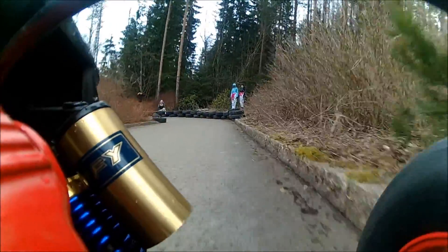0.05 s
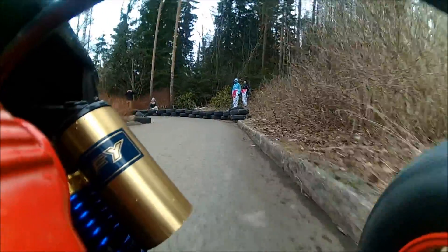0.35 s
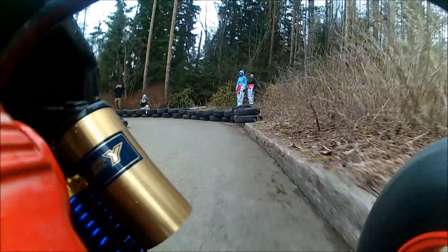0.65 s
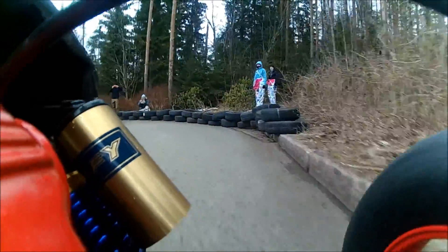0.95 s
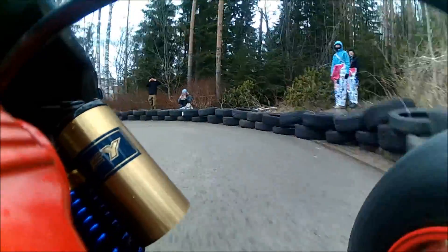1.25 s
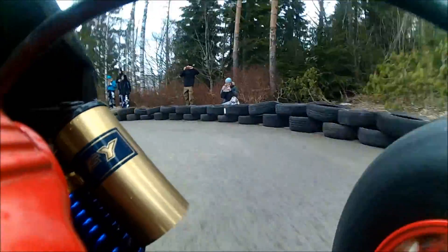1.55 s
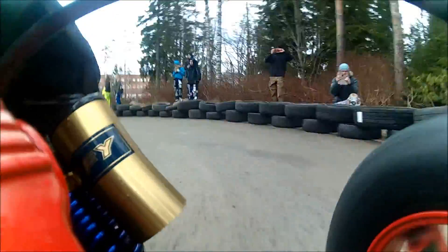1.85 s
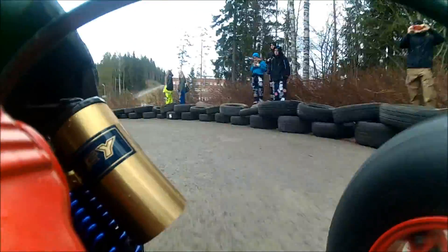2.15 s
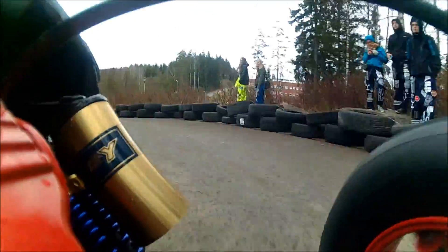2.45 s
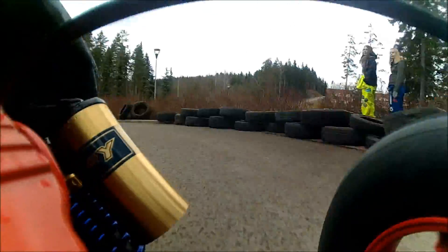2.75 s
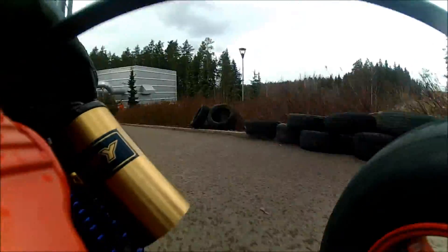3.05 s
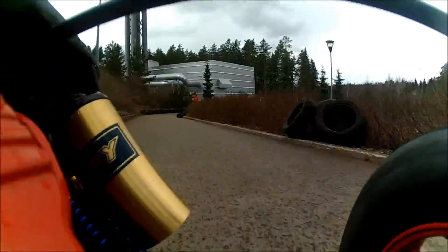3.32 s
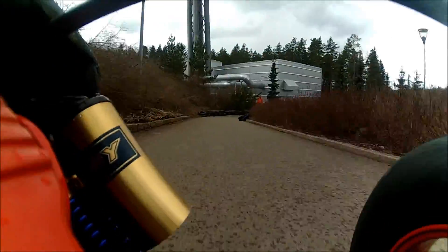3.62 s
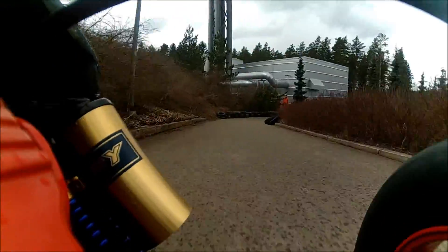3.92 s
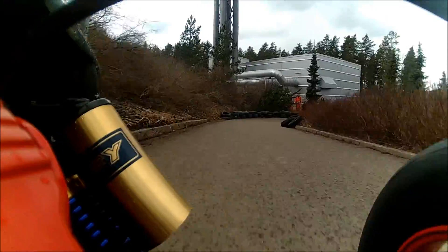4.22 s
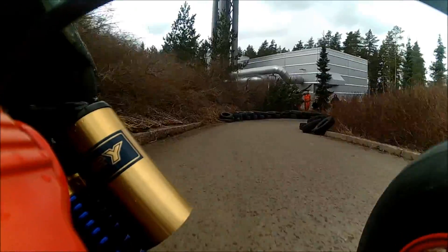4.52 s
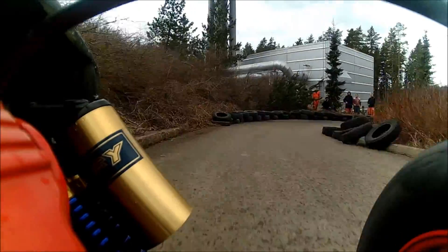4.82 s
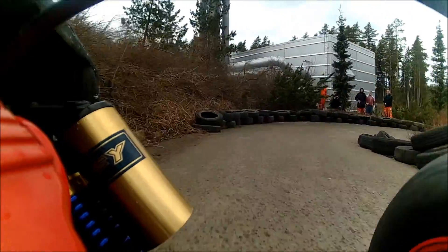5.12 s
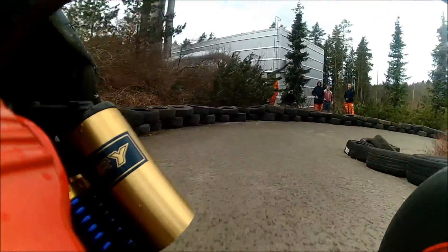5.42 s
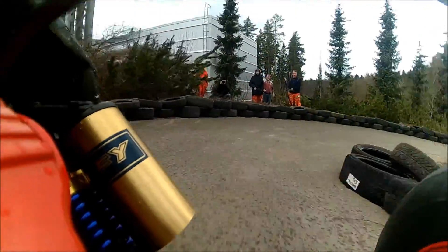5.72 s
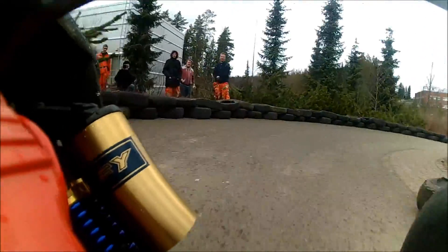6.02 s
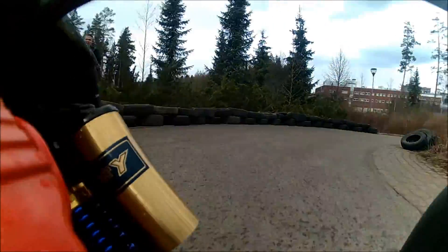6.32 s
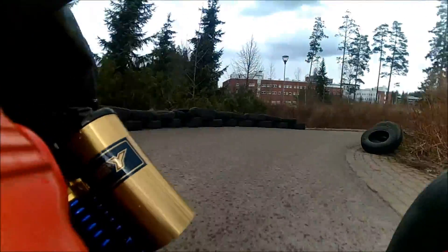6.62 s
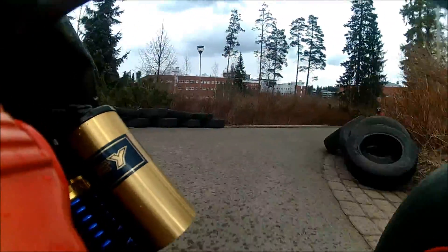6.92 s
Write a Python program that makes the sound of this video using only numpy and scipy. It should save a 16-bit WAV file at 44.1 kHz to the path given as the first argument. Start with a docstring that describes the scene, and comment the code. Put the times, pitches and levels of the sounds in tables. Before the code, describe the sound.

Rapid, hollow chattering and knocking from a cart rolling at speed, with rough tyre noise, short skids and low wind gusts in the bends.

```python
"""An asphalt track with two bends, heard from a camera beside the front wheel of a fast soapbox cart. The
camera mount chatters about 55 times a second, strong and weak in turn; each knock rings the case. In the bends
it shakes faster, loose parts clatter, the tyres skid, the frame drones, wind buffets the microphone and the
rolling noise briefly drops out. A limiter flattens the jolts; the treble falls away steeply above about 4.6
kHz."""
import sys
import numpy as np
from scipy import signal
from scipy.fft import rfft, irfft
from scipy.io import wavfile
from scipy.ndimage import uniform_filter1d, minimum_filter1d

SR = 44100
rng = np.random.default_rng(int(sys.argv[2]) if len(sys.argv) > 2 else 0)


def generate_wav(signal):
    """Clip the signal to [-1, 1] and save it as 16-bit WAV at the path in sys.argv[1]."""
    frames = np.transpose(np.atleast_2d(signal))
    scaled = np.clip(frames, -1, 1) * 32767
    pcm = np.round(scaled).astype(np.int16)
    wavfile.write(sys.argv[1], SR, pcm)


N = 315756
TIME = np.arange(N) / SR
KNOCK_SAMPLES = 1024

# mount shake, faster in the bends (time [s], rate [Hz])
SHAKE = [(0, 59.7), (.55, 58), (1.15, 53), (1.65, 56), (1.85, 88), (2.9, 86), (3.1, 73), (3.4, 72),
         (3.55, 60), (3.85, 56), (4.6, 56), (4.75, 80), (4.9, 54), (5.85, 56), (6.05, 85), (6.5, 70),
         (6.65, 56)]
# hardest knocks of the mount (time [s], level [dB], ring [Hz], thump re ring [dB])
JOLTS = [(0.02, -23, 1050, -12), (0.041, -16, 1010, -20.5), (0.058, -20.5, 845, -13.5),
         (0.077, -21, 1025, -21), (0.113, -19.5, 1010, -22), (0.15, -21.5, 970, -8),
         (0.179, -24, 1020, -11), (0.188, -15.5, 1040, -21), (0.224, -19.5, 1090, -24),
         (0.264, -22.5, 1060, -14), (0.316, -21.5, 810, -15), (0.351, -21.5, 776, -4),
         (0.369, -20.0, 940, -7.5), (0.407, -17, 1070, -25), (0.442, -21.5, 900, -21),
         (0.49, -22, 720, -11), (0.541, -21.5, 970, -7.5), (0.576, -13, 1020, -22),
         (0.612, -19.5, 1070, -22), (0.643, -15.5, 1030, -11), (0.717, -21, 855, -11),
         (0.751, -17, 1070, -30), (0.808, -24, 970, -4), (0.825, -14, 930, -15), (0.859, -19, 1080, -21),
         (0.894, -22.5, 1070, -24), (0.909, -12, 850, -7), (0.97, -19, 1190, -11),
         (1.061, -23.5, 1100, -6.5), (1.08, -21.5, 1124, -21), (1.117, -19.5, 1120, -14),
         (1.137, -22, 940, -15), (1.155, -19.5, 920, -23), (1.173, -21, 1120, -7.5),
         (1.193, -20, 1140, -13), (1.217, -20, 900, -15), (1.236, -18.5, 760, -20),
         (1.27, -16.5, 1054, -12), (1.286, -21, 880, -16), (1.304, -20.5, 1210, -9),
         (1.401, -19, 880, -2.5), (1.456, -19, 870, 2), (1.463, -20.5, 826, -14), (1.487, -19, 920, -23),
         (1.52, -16, 1080, -29), (1.538, -19, 1180, -8), (1.577, -15.5, 880, -18), (1.625, -21.5, 920, -7),
         (1.648, -24.5, 1000, -14), (1.689, -17.5, 840, -23), (1.711, -18, 1080, -22),
         (1.788, -22.5, 1120, -14), (1.799, -16, 1070, -6), (1.849, -18.5, 1130, -22),
         (1.893, -16, 1020, -22), (1.939, -16.5, 995, -29), (1.993, -17.5, 1100, -25),
         (2.031, -15.5, 865, -11.5), (2.113, -18, 930, -18.5), (2.145, -16, 1190, -25),
         (2.162, -20.5, 790, 6), (2.198, -22, 865, -4), (2.232, -23, 815, -4), (2.243, -23.5, 1600, -20),
         (2.254, -23, 1300, -14), (2.274, -16.5, 1220, -7), (2.328, -19.5, 1220, -30),
         (2.384, -18, 1150, -19), (2.406, -17.5, 980, -15), (2.441, -20.5, 1040, -19),
         (2.502, -19.5, 737, -3), (2.541, -15, 974, -32), (2.553, -20.5, 940, -27), (2.63, -20.5, 1120, -9),
         (2.661, -20.5, 1027, -14), (2.67, -17.5, 704, -17), (2.769, -17.5, 880, -15),
         (2.861, -18, 1020, -11), (2.894, -14, 1200, -24), (2.932, -19, 1040, -10), (2.942, -15, 910, -5.5),
         (2.957, -19.5, 1090, -11), (2.968, -23, 1090, -12), (2.991, -20, 1000, -7),
         (3.078, -20, 1086, -9.5), (3.108, -18.5, 920, -23), (3.121, -20, 940, -22),
         (3.174, -20.5, 950, -7), (3.184, -21.5, 1012, -18), (3.216, -18.5, 1080, -21),
         (3.227, -20.5, 955, -2.5), (3.255, -23, 950, -33), (3.286, -21, 770, -6), (3.299, -18, 1060, -21),
         (3.311, -18, 1320, -10), (3.327, -21, 1190, -12), (3.339, -21, 983, -1.5),
         (3.383, -19.5, 890, -26), (3.423, -23, 920, -3), (3.469, -20.5, 1045, -15), (3.5, -20.5, 980, -28),
         (3.613, -23.5, 1010, -10), (3.628, -19, 1090, -9), (3.645, -21, 890, -12), (3.668, -20.5, 750, 0),
         (3.726, -24.5, 770, -9), (3.744, -23, 858.3, -15), (3.819, -20, 988.7, -29),
         (3.89, -17.5, 1060, -6), (3.928, -22.5, 850, -23), (3.944, -21, 797, -13), (4.03, -21, 890, -21),
         (4.119, -21.5, 861, 0.5), (4.152, -20.5, 1130, -25), (4.187, -14, 1087, -27),
         (4.205, -22, 1009, -6), (4.299, -19, 940, -20), (4.315, -20, 958, -3.5), (4.334, -15, 840, -5.5),
         (4.376, -19, 992, -24), (4.41, -15, 1000, -31), (4.449, -21.5, 851, -7), (4.518, -19.5, 1080, -19),
         (4.553, -20.5, 1041, -11), (4.588, -20, 866, -25), (4.826, -21.5, 965, -8),
         (4.873, -22.5, 953.4, -6), (4.93, -19.0, 1030, -11), (4.966, -18, 967.6, -16),
         (5.005, -19, 1100, -15), (5.078, -13.5, 1090, -19), (5.185, -17.5, 1030, -23),
         (5.223, -21, 1090, -26), (5.261, -14.5, 1010, -20), (5.296, -18.5, 1060, -28),
         (5.324, -20, 920, -19), (5.449, -19.5, 1040, -4), (5.464, -20, 950, -12),
         (5.476, -20.5, 1090, -13), (5.507, -16.5, 1030, -30), (5.515, -22, 1010, -18),
         (5.528, -18, 1050, -8.5), (5.565, -22.5, 960, -19), (5.637, -19.5, 940, -15),
         (5.664, -22, 930, -14), (5.691, -15.5, 1080, -21), (5.709, -11, 788, -24), (5.748, -16, 968, -15),
         (5.784, -16.5, 1070, -17), (5.819, -16.5, 1090, -13), (5.855, -20.5, 1090, -16),
         (5.952, -19.5, 1034, -9.5), (5.996, -15, 974, -6), (6.034, -18, 930, -4), (6.086, -14, 970, -26),
         (6.105, -19, 1120, -21), (6.15, -18, 921.6, -7), (6.193, -10, 1030, -26),
         (6.204, -20.5, 1020, 1.5), (6.232, -21.5, 1000, -1), (6.262, -11.5, 1000, -6),
         (6.275, -10, 940, -18), (6.341, -14.5, 934, -24.5), (6.399, -21.5, 988, -3),
         (6.455, -18.5, 1080, -9), (6.563, -23.5, 850, -14), (6.588, -19.5, 1128, -28),
         (6.679, -19.5, 1080, -7), (6.733, -22, 945, -16), (6.748, -20.5, 1020, 2), (6.762, -14, 901, -13),
         (6.768, -17, 790, -9), (6.799, -17, 1080, -16), (6.844, -20.5, 1010, -16), (6.859, -20.5, 940, -4),
         (6.908, -20.5, 875, -15), (6.938, -18, 869, -5), (6.943, -19, 944, -13), (7.037, -13.5, 1070, -21),
         (7.147, -18.5, 1010, -13.5)]
# dry contact spectrum (frequency [Hz], level [dB])
TICK_SPECTRUM = [(300, -9), (1200, -5), (2000, 4), (2600, 3.5), (3300, 1), (4000, -3), (8000, -15.5),
                 (15000, -24.5)]


def mount(tap_s, shake_count, tap_hz=880, alternation_db=0.66, miss_db=9, miss_share=.08):
    """Mount hitting its seat: hard jolts, taps between; faster taps are lighter and more uneven."""
    # tap strength (time [s], level [dB])
    chatter = [(0.0, -24.5), (0.83, -25), (1.03, -27), (2.16, -28), (2.21, -27), (2.4, -24.5),
               (2.48, -32.5), (2.93, -30.5), (3.01, -29), (3.12, -26), (3.58, -26), (3.92, -28.5),
               (4.0, -33.5), (4.16, -25), (4.56, -24.5), (4.69, -35.5), (4.8, -32.5), (4.96, -27),
               (5.31, -23), (5.39, -34), (5.49, -22.5), (5.6, -26.5), (5.71, -24.5), (5.89, -26.5),
               (6.0, -25), (6.51, -26.5), (6.64, -29), (6.72, -25.5), (7.15, -26)]
    # wheel briefly runs smoothly (centre [s], length [s], change [dB])
    lulls = [(.51, 0.032, -7), (.68, 0.043, -8.5), (.935, 0.025, -13), (1.01, 0.027, -4.5),
             (1.425, 0.075, -14.5), (1.67, 0.03, -6), (2.47, 0.051, -6.5), (3.03, .07, -5.5),
             (3.58, 0.078, -12.5), (3.763, 0.04, -16), (3.98, 0.027, -14), (4.484, .025, -13),
             (4.245, 0.057, -6), (4.85, 0.037, -5.5), (5.39, 0.057, -7.5), (5.925, 0.065, -10.5),
             (6.245, 0.026, -6), (6.385, 0.045, -4.5), (6.89, 0.046, -5.5), (6.99, 0.027, -14)]
    jolt_s, strength_db, ring_hz, thump_db = np.transpose(JOLTS)
    jolt_db = strength_db - 0.4
    jolts = knocks(jolt_s, jolt_db, ring_hz, thump_db, width_hz=573, bounce=1.0, bounce_s=.00176)

    level_draw, pitch_draw, thump_draw = rng.standard_normal((3, len(tap_s)))
    faster_oct = np.log2(shake_ratio(tap_s))
    uneven_db = (1.5 + 0.5 * faster_oct) * level_draw - miss_db * (rng.random(len(tap_s)) < miss_share)
    last_before_jolt = np.r_[np.diff(shake_count) < 1, False]
    pattern_db = alternation_db * (-1) ** shake_count - 1.0 * last_before_jolt
    lull_db = swells(lulls)
    tap_db = at(chatter, tap_s) + 2 + np.interp(tap_s, TIME, lull_db)
    tap_db += pattern_db + uneven_db - 3 * faster_oct
    tap_args = tap_s, tap_db, tap_hz * np.exp(.18 * pitch_draw), -15 + 7 * np.minimum(thump_draw, 1)
    taps = knocks(*tap_args, width_hz=780, bounce=0.9, bounce_s=.001968) + double_knocks(*tap_args)
    return jolts + taps + contacts(np.r_[jolt_s, tap_s], np.r_[jolt_db, tap_db], lull_db)


def chatter_times(jolt_s, jitter=.06):
    """One tap per shake between jolts, looser when fast. Returns times and shakes since the jolt."""
    shakes = np.cumsum(at(SHAKE)) / SR
    edges = np.r_[0, np.interp(jolt_s, TIME, shakes), shakes[-1]]
    runs = [np.linspace(a, b, max(round(b - a), 1) + 1)[1:-1] for a, b in zip(edges, edges[1:])]
    tap_s = np.interp(np.concatenate(runs), shakes, TIME)
    shake_count = np.concatenate([1 + np.arange(len(run)) for run in runs])
    rate_hz = at(SHAKE, tap_s)
    jitter_s = jitter * (rate_hz / np.mean(rate_hz)) ** 4 / rate_hz
    return tap_s + jitter_s * rng.standard_normal(len(tap_s)), shake_count


def knocks(times_s, level_db, ring_hz, thump_db, width_hz, bounce, bounce_s):
    """Each knock lands and bounces twice within a few ms, exciting a case ring and a lower thump."""
    # camera case spectrum (frequency [Hz], level [dB])
    case_spectrum = [(40, -22.5), (150, 8), (300, 0), (500, 7), (800, 3), (1300, 2), (1600, -3.5),
                     (2000, -4.5), (2500, -15.5), (3200, -23), (4400, -33.5), (8000, -52)]
    size = KNOCK_SAMPLES
    gap1, gap2, bounce1, bounce2, polarity = rng.random((5, len(times_s), 1))
    bins_hz = np.fft.rfftfreq(size, 1 / SR)
    first_s = bounce_s * (0.46 + gap1)
    second_s = first_s + bounce_s * (0.31 + gap2)
    force = 1 + bounce * (2 * bounce1 - 1) * np.exp(-2j * np.pi * bins_hz * first_s)
    force += bounce * (bounce2 - .5) * np.exp(-2j * np.pi * bins_hz * second_s)
    build_up = 1 - 2 * resonance(ring_hz[:, None], 2200, size)  # all-pass: delays the ring
    ring = resonance(ring_hz[:, None], width_hz, size) ** 2 * build_up
    thump = undb(thump_db)[:, None] * resonance(520, 330, size) ** 2
    sounds = irfft(np.sign(polarity - .5) * force * (ring - thump) * response(case_spectrum, size))
    rms = np.sqrt(np.sum(sounds ** 2, axis=1) / (.006 * SR))  # energy spread over 6 ms
    return place(times_s, sounds * (undb(level_db) / rms)[:, None])


def double_knocks(times_s, level_db, ring_hz, thump_db, share=.13, mean_lag_s=.005):
    """Some taps double: a softer, lower knock follows."""
    twice = rng.random(len(times_s)) < share
    later_s = times_s + mean_lag_s * (.5 + rng.random(len(times_s)))
    return knocks(later_s[twice], level_db[twice] - 3, .9 * ring_hz[twice], thump_db[twice],
                  width_hz=1000, bounce=0.9, bounce_s=.002)


def contacts(knock_s, knock_db, lull_db, lag_s=.0004):
    """Dry tick and sharp snap as the mount meets its seat."""
    # snap spectrum (frequency [Hz], level [dB])
    snap_spectrum = [(1500, -28.5), (3000, -9), (4500, -3.5), (8000, -1), (12000, -2.5), (15000, -4)]
    # treble of the knocks (time [s], level [dB])
    treble = [(0.0, -88.5), (0.16, -71.5), (0.42, -92.5), (1.38, -82), (1.84, -72.5), (2.37, -75.5),
              (3.13, -78), (3.36, -74.5), (3.57, -94), (3.65, -81), (4.0, -85.5), (4.48, -89.5),
              (4.75, -73), (4.88, -94.5), (5.22, -79), (5.89, -83.5), (6.03, -72), (6.46, -80),
              (6.56, -71.5), (6.69, -83), (6.8, -74.5), (6.91, -94), (7.15, -74)]
    # glancing hits, thin and bright (centre [s], length [s], tick rise [dB])
    glances = [(3.69, 0.034, 13), (4.745, 0.15, 10), (6.78, 0.072, 2)]
    times_s = knock_s + lag_s
    tick = ticks(times_s, knock_db, TICK_SPECTRUM, crunch=.25, crunch_s=.002, follow=.76, scatter_db=7)
    snap = ticks(times_s, knock_db, snap_spectrum, crunch=.13, crunch_s=.00054, follow=.1, scatter_db=16)
    treble_db = at(treble)
    tick_db = -53 + lull_db / 2 + swells(glances) + .3 * (treble_db - np.mean(treble_db))
    return undb(tick_db) * tick + undb(treble_db + 14) * snap


def ticks(times_s, knock_db, spectrum, crunch, crunch_s, follow, scatter_db):
    """Impulses with a decaying crunch, partly following knock level; rms 1."""
    noise = 2 * rng.random((len(times_s), KNOCK_SAMPLES)) - 1
    contact = 2 * crunch * noise * np.exp(-np.arange(KNOCK_SAMPLES) / SR / crunch_s)
    contact[:, 0] = 1
    level_db = follow * knock_db + scatter_db * noise[:, 0]
    return colour(place(times_s, contact * undb(level_db)[:, None]), spectrum)


def tyres(roar_db, scrub_onset_db=-39, crunch_s=.001):
    """Rubber on coarse asphalt: fine grit roars; scrubbing adds judder and louder stone clacks."""
    # tyre roar spectrum (frequency [Hz], level [dB])
    roar_spectrum = [(60, -32.5), (200, -11.5), (350, -7.5), (500, 0.5), (750, 2.5), (1050, 4), (1400, -5),
                     (2000, -11.5), (2500, -24.5), (3200, -51), (4400, -55.5), (8000, -61)]
    road = grit(rate_hz=520, spread_db=-1.0) + undb(-3) * rng.standard_normal(N)
    rolling = colour(road, roar_spectrum) + undb(-40) * colour(road, TICK_SPECTRUM)
    stones = grit(rate_hz=120, spread_db=2.2)
    crunch_envelope = signal.lfilter([1], [1, -np.exp(-1 / (crunch_s * SR))], np.abs(stones))
    crunch = crunch_envelope * rng.standard_normal(N)
    clacks = undb(-4) * colour(stones, roar_spectrum) + undb(-31) * colour(crunch, TICK_SPECTRUM)
    scrub = (2.06 + np.tanh((roar_db - scrub_onset_db) / 2)) / 2
    judder_db = (1.3 + 2.4 * scrub) * np.minimum(wander(120), 1.2)
    return (rolling + scrub * clacks) * undb(roar_db + judder_db - 2 * scrub)


def grit(rate_hz, spread_db):
    """Random impacts at rms 1; a few are larger (spread > 0) or smaller (spread < 0)."""
    hit, sign, size = rng.random((3, N))
    size_db = -spread_db * np.log(np.maximum(size, .06))
    return unit((hit < rate_hz / SR) * np.sign(sign - .5) * undb(size_db))


def pre_knock_dips_db(knock_s, dip_db=-7, dip_db_per_oct=-12, lead_s=.006):
    """The rolling noise dips briefly just before each knock, deeper at higher shake rates."""
    dipping = np.zeros(N)
    for s in knock_s:
        dipping[int(max(s - lead_s, 0) * SR):int(max(s, 0) * SR)] = 1
    return (dip_db + dip_db_per_oct * np.log2(shake_ratio())) * uniform_filter1d(dipping, size=96)


def clatter(load_db, loose_db=-37, centre_hz=950, scatter_db=4, count=400):
    """Loose chassis parts knock at random pitches, loud under high load and fast shake."""
    times_s = rng.random(count) * TIME[-1]
    level_draw, pitch_draw = rng.standard_normal((2, count))
    drive_db = np.interp(times_s, TIME, load_db)
    shaken = np.clip(shake_ratio(times_s) - 1, .01, .3) / .3
    level_db = drive_db + 4.5 + np.minimum(drive_db - loose_db, 0)
    level_db += 20 * np.log10(shaken) + scatter_db * level_draw
    return knocks(times_s, level_db, centre_hz * np.exp(.3 * pitch_draw), thump_db=np.full(count, -10),
                  width_hz=500, bounce=0.58, bounce_s=.0014)


def frame(drift=.007):
    """Road-driven frame modes waver as it flexes; the lowest swells most."""
    # frame modes (frequency [Hz], nominal width [Hz], gain [dB])
    modes = [(111.1, 5.3, -12.5), (289.3, 11, 1.5), (478.6, 28, 3)]
    # frame drone (time [s], level [dB])
    drone = [(0.0, -47.5), (0.53, -46.5), (0.8, -44.5), (1.04, -48.5), (1.31, -43.5), (2.48, -44.5),
             (2.77, -38), (3.09, -47.5), (4.03, -47.5), (4.32, -45.5), (4.78, -52.5), (5.47, -42.5),
             (5.57, -49), (6.05, -40.5), (6.22, -43.5), (6.48, -37.5), (6.74, -41.5), (7.15, -44)]
    drone_db = at(drone)
    swell_db = 0.5 * (drone_db - np.mean(drone_db))
    lowest_hz = modes[0][0]
    flexed_samples = np.cumsum(1 + drift * wander(6))
    out = np.zeros(N)
    for hz, width_hz, gain_db in modes:
        hum = np.interp(flexed_samples, np.arange(N), ringing_noise(hz, 2 * width_hz), period=N)
        out += undb(drone_db + gain_db - 1 + swell_db * (lowest_hz / hz) ** 2) * hum
    return out


def scrapes(relative_width=0.17):
    """Chassis parts rub briefly and rasp around one pitch."""
    # rubs (start [s], length [s], level [dB], pitch [Hz])
    rubs = [(1.314, 0.025, -26, 1000), (1.57, 0.014, -44, 2100), (2.76, 0.017, -36.5, 2140),
            (2.82, 0.0083, -38, 2630), (3.072, 0.015, -45, 2430), (5.11, 0.018, -38, 2300),
            (5.113, 0.07, -28, 490), (5.136, 0.017, -23, 1850), (5.85, 0.031, -50.5, 2630),
            (6.136, 0.05, -29.5, 467), (6.264, 0.0081, -22, 520), (6.461, 0.05, -40.5, 1920)]
    out = np.zeros(N)
    for start_s, length_s, level_db, hz in rubs:
        arch = np.sin(np.pi * np.clip((TIME - start_s) / length_s, 0, 1))
        out += undb(level_db) * np.sqrt(np.abs(arch)) * ringing_noise(hz, relative_width * hz)
    return out


def pings(decay_s=.0022):
    """Thin, high ticks of loose metal on metal."""
    # strikes (time [s], level [dB])
    strikes = [(1.025, -50), (1.218, -50), (1.578, -41), (1.647, -45), (1.79, -46), (1.963, -46),
               (2.094, -46), (2.568, -43), (2.767, -46), (2.816, -48), (3.354, -43), (4.725, -49),
               (4.757, -56), (6.533, -54)]
    envelope = sum(undb(db) * (TIME > s) * np.exp(-np.abs(TIME - s) / decay_s) for s, db in strikes)
    return envelope * ringing_noise(hz=8600, width_hz=1700)


def wind(flutter_db=1, boom_db=-59):
    """Low buffeting on the microphone over a steadier deep boom."""
    # buffeting spectrum (frequency [Hz], level [dB])
    spectrum = [(15, -63.5), (26, -45), (34, -19.5), (44, -8.5), (58, -7), (90, -6), (200, -8.5),
                (400, -25), (1000, -33.5), (3000, -57.5)]
    # gusts (time [s], level [dB])
    gusts = [(0.0, -59), (1.09, -66), (1.84, -48), (2.73, -52.5), (3.17, -47.5), (4.24, -75), (4.74, -65),
             (5.05, -64.5), (5.8, -61.5), (6.05, -47.5), (6.6, -57), (7.15, -61.5)]
    gust_db = at(gusts)
    boom = ringing_noise(hz=45, width_hz=18) * undb(boom_db + 0.41 * (gust_db - np.mean(gust_db)))
    buffeting = colour(rng.standard_normal(N), spectrum) * undb(gust_db - 1 + flutter_db * wander(25))
    return buffeting + boom


def undb(db):
    """Decibels to gain."""
    return 10 ** (np.asarray(db) / 20)


def unit(x):
    """Scale to rms 1."""
    return x / np.sqrt(np.mean(x ** 2))


def at(table, times_s=TIME):
    """Interpolate a (time [s], value) curve."""
    return np.interp(times_s, *np.transpose(table))


def shake_ratio(times_s=TIME):
    """Shake rate over its starting value."""
    return at(SHAKE, times_s) / SHAKE[0][1]


def swells(table):
    """Sum of cosine arches in dB from (centre [s], length [s], change [dB]) rows."""
    return sum(db * np.cos(np.pi * np.clip((TIME - s) / length_s, -.5, .5)) for s, length_s, db in table)


def wander(rate_hz):
    """Random steps, smoothed twice; spread near 1."""
    hold = int(SR / rate_hz)
    steps = np.repeat(rng.standard_normal(N // hold + 1), hold)
    return 1.65 * uniform_filter1d(uniform_filter1d(steps, hold), hold)[:N]


def response(points, size):
    """Minimum-phase response through (frequency [Hz], level [dB]) points."""
    hz, db = np.transpose(points)
    bins_hz = np.maximum(np.fft.rfftfreq(size, 1 / SR), 1)
    gain = undb(np.interp(np.log(bins_hz), np.log(hz), db))
    cepstrum = irfft(np.log(gain), size)
    cepstrum[1:size // 2] *= 2
    cepstrum[size // 2 + 1:] = 0
    return np.exp(rfft(cepstrum))


def colour(x, spectrum):
    """Filter by a spectrum; rms 1."""
    return unit(irfft(rfft(x) * response(spectrum, N), N))


def resonance(hz, width_hz, size):
    """Frequency response of one damped mode."""
    s = 1j * np.fft.rfftfreq(size, 1 / SR)
    return s * width_hz / (s ** 2 + s * width_hz + hz ** 2)


def ringing_noise(hz, width_hz):
    """Noise passed twice through a resonance; rms 1."""
    return unit(irfft(rfft(rng.standard_normal(N)) * resonance(hz, width_hz, N) ** 2, N))


def place(times_s, sounds):
    """Add knock-length sounds at their start times."""
    out = np.zeros(N + KNOCK_SAMPLES)
    for start, sound in zip(np.clip(times_s * SR, 0, N - 1).astype(int), sounds):
        out[start:start + KNOCK_SAMPLES] += sound
    return out[:N]


def scene():
    """Mount, tyres, chassis, frame and wind, close to the microphone; mono."""
    # tyre roar under load, high in the bends (time [s], level [dB])
    load = [(0, -40), (.65, -40.5), (1.15, -41.5), (1.55, -34), (2.0, -35.5), (2.5, -35), (2.62, -31.5),
            (2.9, -36.5), (3.05, -36), (3.35, -35), (3.6, -38.5), (4.05, -39.5), (4.25, -38.5), (4.55, -38),
            (4.75, -37.5), (4.95, -38), (5.45, -34), (5.56, -38), (5.8, -39), (6.0, -31.5), (6.55, -34),
            (6.9, -38.5), (7.16, -37)]
    # skids (centre [s], length [s], roar rise [dB])
    skids = [(1.578, 0.046, 14), (1.63, 0.063, 5.5), (1.75, 0.17, 2.5), (1.85, 0.097, 7), (2.0, 0.037, 5),
             (2.04, 0.028, 11), (2.122, 0.11, 12.5), (2.39, 0.055, 11), (2.45, 0.027, 6), (2.5, 0.058, 4),
             (2.587, 0.037, 8), (2.65, 0.064, 6.5), (2.7, 0.083, 9), (2.77, 0.068, 11.5), (2.85, 0.078, 5),
             (2.9, 0.083, 8), (2.945, 0.065, 11.5), (3.08, 0.058, 8.5), (3.665, .03, 11.5),
             (3.88, 0.048, 12), (5.87, 0.038, 12), (6.018, 0.091, 8.5), (6.08, 0.042, 6.5),
             (6.16, 0.053, 8.5), (6.275, 0.034, 4), (6.33, 0.11, 6), (6.48, 0.08, 10), (6.785, 0.061, 10)]
    # brief dropouts: rolling noise cuts out between knocks (centre [s], length [s], change [dB])
    dropouts = [(1.703, 0.013, 1), (1.93, 0.073, -27), (2.21, 0.067, -2.5), (2.54, 0.04, -12),
                (2.997, 0.05, -13.5), (3.13, 0.031, -23), (3.235, 0.035, -23), (3.32, 0.037, -5),
                (3.495, 0.027, -2), (6.249, 0.026, -11), (6.42, 0.026, -0.5), (6.59, 0.073, -16)]
    jolt_s = np.transpose(JOLTS)[0]
    tap_s, shake_count = chatter_times(jolt_s)
    load_db, skid_db = at(load), swells(skids)
    dip_db = pre_knock_dips_db(np.r_[jolt_s, tap_s]) * (skid_db < 1)  # no dips in a skid
    rolling = tyres(load_db + skid_db + dip_db) + clatter(load_db) * undb(dip_db) + frame()
    mix = mount(tap_s, shake_count) + rolling * undb(swells(dropouts)) + scrapes() + pings() + wind()
    return mix[None]


def limiter(x, ceiling_db=-10.8):
    """Look-ahead limiter: ducks each peak to the ceiling in about a millisecond."""
    needed_gain = np.minimum(1, undb(ceiling_db) / (np.abs(x) + 1e-9))
    held_gain = minimum_filter1d(needed_gain, size=49)
    return x * uniform_filter1d(uniform_filter1d(held_gain, size=29), size=21)


def record(dry):
    """The camera limits the knocks; the treble falls away steeply above about 4.6 kHz, with a faint band near
    8.5 kHz."""
    # treble response (frequency [Hz], gain [dB])
    treble_response = [(4000, -0.5), (4600, -8.5), (5200, -29), (6800, -20), (8500, -8.5), (12000, -13.5),
                       (15000, -38.5)]
    cutoff_hz, fade_s = 15500, .004
    muffled = irfft(rfft(limiter(dry), 2 * N) * response(treble_response, 2 * N))[:, :N]
    lowpass = signal.ellip(8, .2, 70, cutoff_hz, fs=SR, output="sos")
    fade_out = np.minimum((TIME[-1] - TIME) / fade_s, 1)
    return fade_out * signal.sosfilt(lowpass, muffled)


dry = scene()
out = record(dry)
generate_wav(out)
```